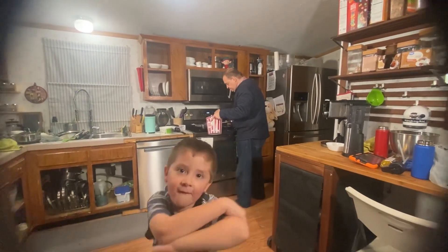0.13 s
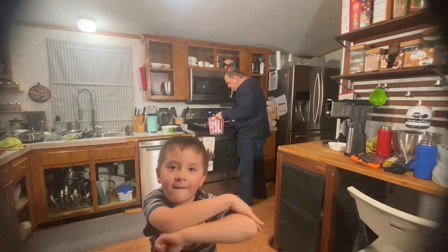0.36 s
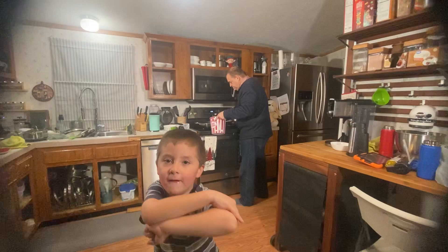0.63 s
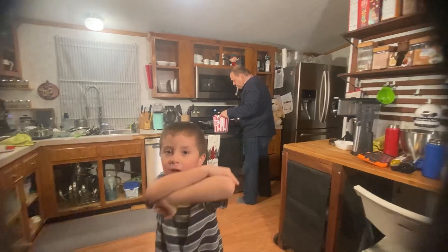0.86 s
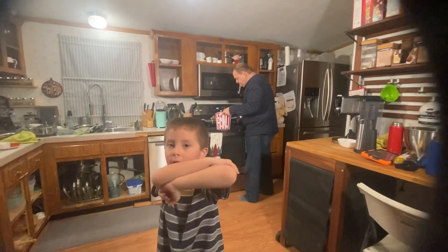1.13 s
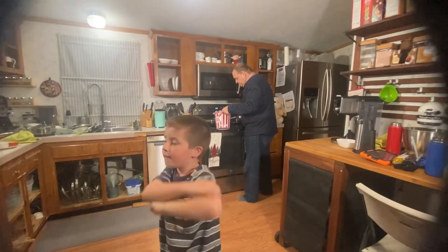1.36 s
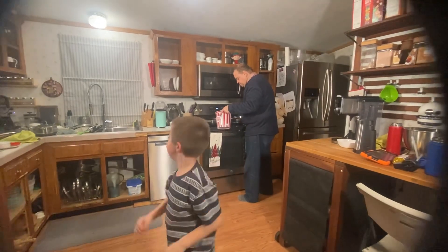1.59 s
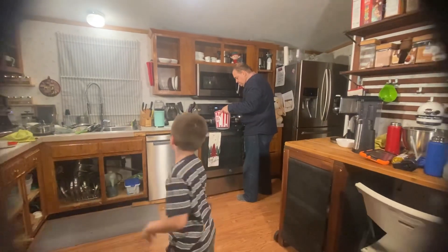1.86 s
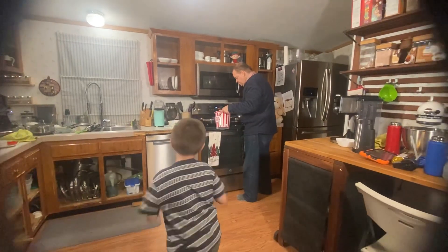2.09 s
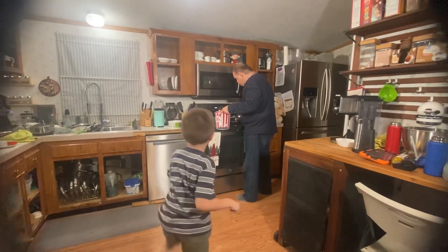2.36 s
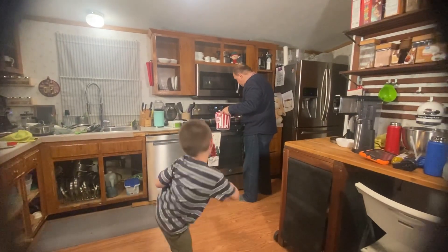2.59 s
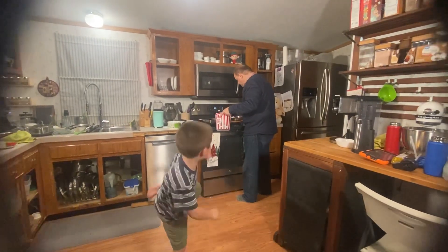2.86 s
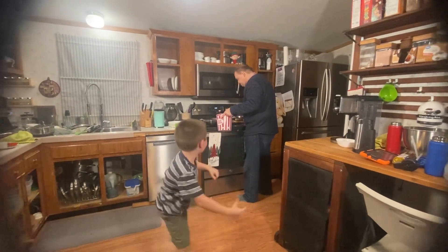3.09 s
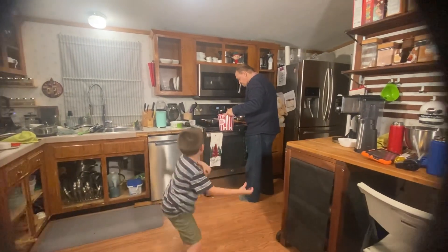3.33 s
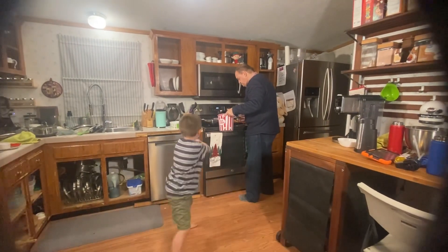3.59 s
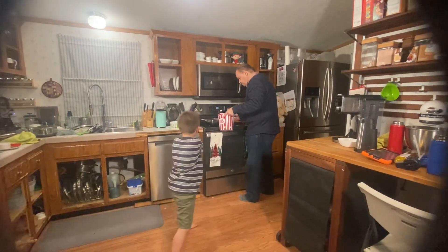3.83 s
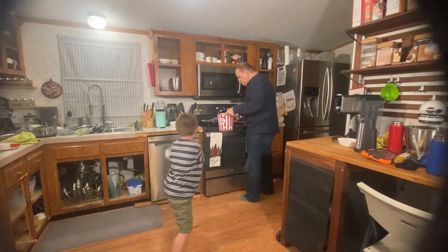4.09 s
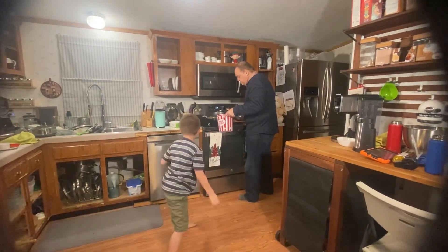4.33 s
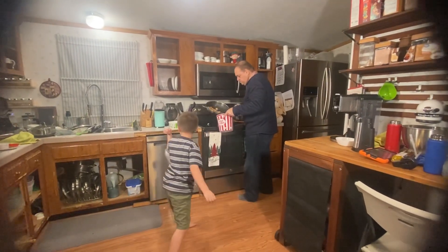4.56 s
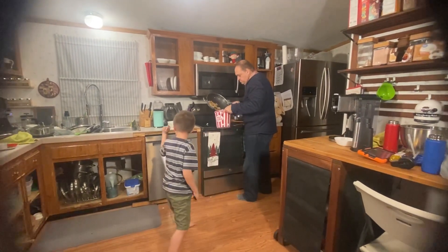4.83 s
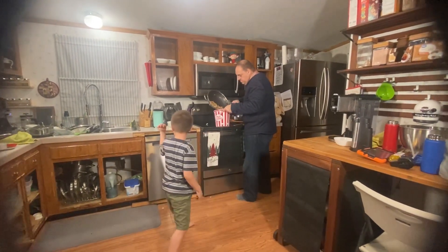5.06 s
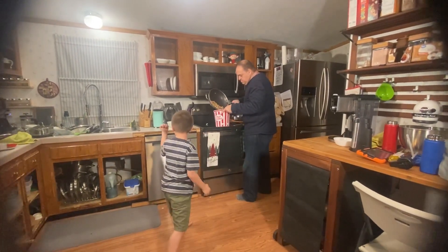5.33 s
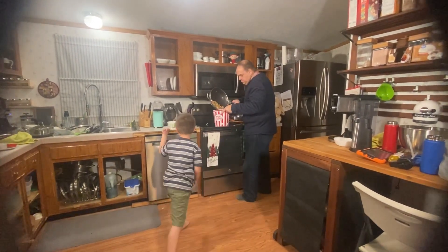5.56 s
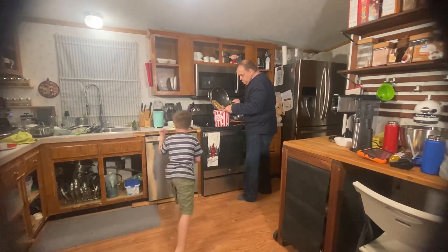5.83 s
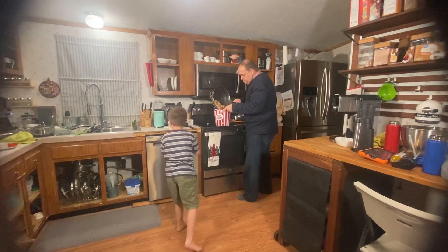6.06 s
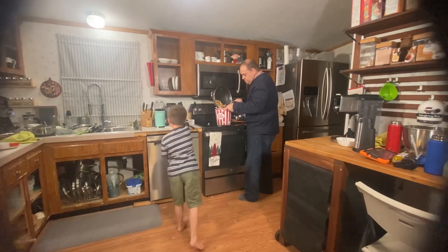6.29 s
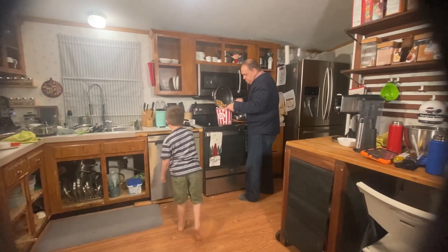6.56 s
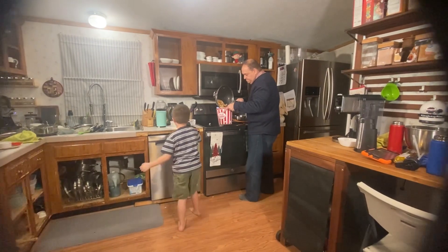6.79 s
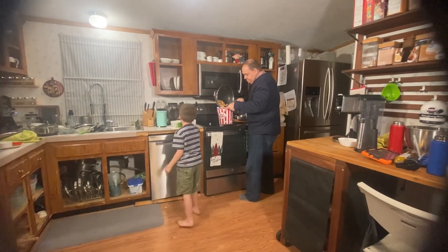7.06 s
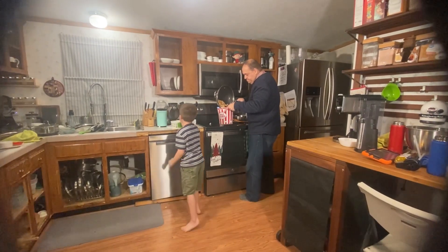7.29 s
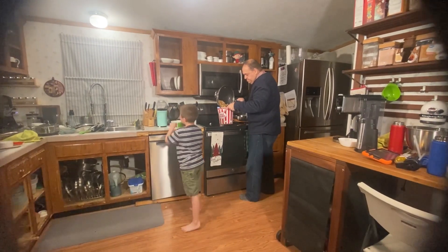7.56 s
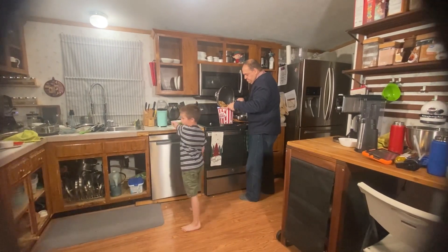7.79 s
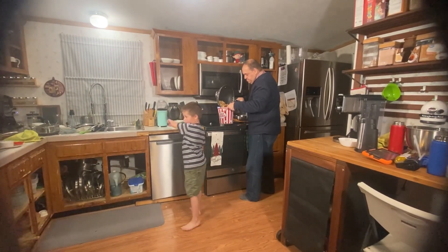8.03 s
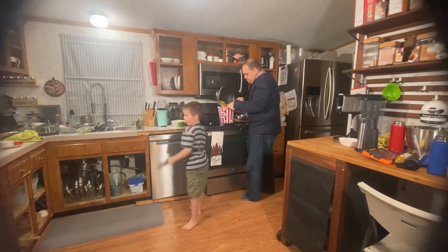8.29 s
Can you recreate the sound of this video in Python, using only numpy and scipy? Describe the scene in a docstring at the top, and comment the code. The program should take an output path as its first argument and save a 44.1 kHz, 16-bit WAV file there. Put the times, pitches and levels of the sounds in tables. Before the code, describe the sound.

A lid rings briefly, followed by a pause over appliance hum. Sharp spoon knocks on a damped pot mix with low rustling at the microphone, a loud diving bump and busy scraping and barefoot shuffling on a wooden floor. Two heavier footfalls land, scraping fades, and quieter scattered pot knocks continue with tiny dry clicks. Short indoor reverberation, recorded by a small camera from across the kitchen.

```python
"""Popcorn pot across a home kitchen

A small camera with two microphone ports hears a spoon knock and scrape a pot of sticky popcorn across the room:
damped resonances with noise cracks, and clumped noise grains. Bare feet thud (floor modes) and shuffle on the wood;
a lid clangs (unsteady modes), dry ticks click, rustles brush the ports and bumps shake the mount (diving chirps).
A fridge and a fan hum underneath (wavering lines and shaped noise), and their level dips twice."""
import sys
import numpy as np
from scipy import signal
from scipy.fft import rfft, irfft, next_fast_len
from scipy.io import wavfile
from scipy.ndimage import uniform_filter1d, map_coordinates

SR = 44100
rng = np.random.default_rng(int(sys.argv[2]) if len(sys.argv) > 2 else 0)


def output_pcm(signal):
    """Save a mono or channel-first signal as 16-bit PCM at the path in sys.argv[1].

    Samples are clipped to [-1, 1] before scaling.
    """
    pcm = np.clip(np.atleast_2d(signal).T, -1, 1) * 32767
    wavfile.write(sys.argv[1], SR, np.round(pcm).astype(np.int16))


def volts_from_decibels(level):
    """Turn decibel levels (scalar or array-like) into linear amplitude factors."""
    exponent = np.asarray(level, float) / 20
    return 10 ** exponent


N = 370881

# Treble colour of grainy noise and dry ticks. Each row: frequency in Hz, relative density in dB per Hz.
FIZZ_COLOUR = [(2940, -28.5), (5000, -2), (5420, -2), (7160, 3), (8530, -5), (9710, -5.5), (11600, -25.5),
               (15100, -50), (22000, -120)]
# Half the left-right difference goes to each port.
LEFT_RIGHT = np.array([[.5], [-.5]])


def unit(x):
    """Scaled to rms 1."""
    return x / np.sqrt(np.mean(x ** 2) + 1e-20)


def along(points, hz):
    """Values at hz, read between (Hz, value) points on a log axis."""
    f, v = np.transpose(points)
    return np.interp(np.log(hz + 1), np.log(f + 1), v)


def wobble(rate):
    """A smooth random curve, rate knots a second."""
    knots = rng.standard_normal(int(N * rate / SR) + 4)
    coarse = np.arange(0, N + 16, 16)  # the spline is read every 16 samples
    return np.interp(np.arange(N), coarse, map_coordinates(knots, [coarse * rate / SR]))


def filtered(x, response):
    """x times a complex response of frequency."""
    m = next_fast_len(N + 8192)
    return irfft(rfft(x, m) * response(np.fft.rfftfreq(m, 1 / SR)), m)[..., :N]


def coloured(x, spectrum):
    """x weighted by a spectrum in dB."""
    return filtered(x, lambda hz: volts_from_decibels(along(spectrum, hz)))


def modes(table):
    """The causal response of resonances, given as (Hz, width Hz, dB), with alternating signs."""
    def response(f):
        total = 0
        for k, (centre, width, db) in enumerate(table):
            damping = 1j * f * width
            total = total + (-1) ** k * volts_from_decibels(db) * damping / (centre * centre - f * f + damping)
        return total
    return response


def swells(table, shape):
    """For each row a gain that climbs to its peak and sinks, 20 dB down one rise before and one fall after.
    Shape 1 gives pointed swells, 2 bell-shaped, more flat-topped."""
    for s, db, rise, fall, last in table:
        start = max(round((s - 3 * rise) * SR), 0)
        end = min(round((s + 3 * fall) * SR), N)
        t = np.arange(start, end) / SR - s
        distance = np.abs(t / np.where(t < 0, rise, fall))
        yield slice(start, end), volts_from_decibels(db - 20 * distance ** shape), last


def patchy(depth_db):
    """A pair of noises whose colour shifts in random patches, the same patches in both."""
    z = signal.stft(rng.standard_normal((2, N)), nperseg=256)[2]
    field = uniform_filter1d(rng.standard_normal(z.shape[1:]), size=2, axis=0)
    field = uniform_filter1d(field, size=36, axis=1)
    return signal.istft(z * volts_from_decibels(depth_db * unit(field)), nperseg=256)[1][:, :N]


def diffuse(pair, spectrum):
    """Two unrelated noises given a spectrum and mixed to the likeness of the room's sound field, rms 1."""
    # Likeness of the two ports. Each row: frequency in Hz, left-right correlation (1 = alike, -1 = opposite).
    likeness = [(35, 0.3), (60, -1.3), (140, 1), (340, 0.24), (820, -0.21), (1950, -0.15), (4660, -0.09),
                (11100, 0.11)]

    def weights(hz):
        turn = np.arccos(np.clip(along(likeness, hz), -1, 1)) / 2
        return volts_from_decibels(along(spectrum, hz)) * [np.cos(turn), np.sin(turn)]

    mid, side = filtered(pair, weights)
    return unit(np.array([mid + side, mid - side]))


def room(share, early_db):
    """A stereo tail, energy 1 at the left: near walls load the start; each frequency dies at its own speed,
    then the camera's noise suppression cuts the tail short."""
    # Decay of the tail as the camera passes it. Each row: frequency in Hz, scale of the decay time in seconds.
    decay = [(200, 0.35), (1000, 0.35), (4000, 0.32), (10000, 0.073)]
    hz, t, z = signal.stft(rng.standard_normal((2, SR // 5)), SR, nperseg=128)
    age = t / (np.clip(share, .05, 2) * along(decay, hz)[:, None])
    late = volts_from_decibels(-35 * age - 60 * age ** 3)  # the cubic term is the suppression's cut
    early = volts_from_decibels(early_db - 60 * t / 0.049)
    tail = signal.istft(z * (late + early), SR, nperseg=128)[1]
    tail *= 1 - np.exp(-np.arange(tail.shape[1]) / SR / 0.0026)  # the echoes thicken at first
    return tail / np.linalg.norm(tail[0])


def dips():
    """A background gain that slides down, holds, and creeps back."""
    # Each row: start in seconds, depth in dB, fall in seconds, hold in seconds, recovery time constant in seconds.
    moments = [(2.844, -8, .11, 0.22, 0.059), (4.835, -8.5, 0.03, .02, 0.48)]
    t = np.arange(N) / SR
    total_db = 0
    for s, db, fall, hold, back in moments:
        slide = np.clip((t - s) / fall, 0, 1)
        total_db = total_db + db * slide * np.exp(-np.maximum(t - s - fall - hold, 0) / back)
    return volts_from_decibels(total_db)


def hum():
    """Motor lines that waver a little in level and phase."""
    # Each row: frequency in Hz, left rms in dB, right rms in dB, lead of the right port in radians,
    # waver in dB (the sign only flips the random curve; a tenth of it, in radians, sways the phase).
    lines = [(54.5, -61.5, -54.5, 0.25, -1), (74.7, -47.5, -43, 0.092, 0), (115, -73, -64.5, 0.066, 4),
             (151.7, -72, -69.5, 0, -3), (172.6, -73.5, -66.5, 0.16, 4.5), (240.7, -69, -76, 0.047, 3.5),
             (284, -67.5, -65.5, 0.16, 2), (326.8, -64.5, -64, 0, 4)]
    t = np.arange(N) / SR
    out = np.zeros((2, N))
    for hz, left_db, right_db, lead, waver_db in lines:
        level = np.sqrt(2) * volts_from_decibels([[left_db], [right_db]] + waver_db * wobble(2.8))
        sway = 0.1 * waver_db * wobble(2.0)
        out += level * np.sin(2 * np.pi * hz * t + rng.uniform(0, 2 * np.pi) + sway + [[0], [lead]])
    return out


def air(spectrum, db):
    """The steady rush of the appliances: diffuse noise whose level wavers slightly."""
    return volts_from_decibels(db + 0.73 * wobble(6.8)) * diffuse(rng.standard_normal((2, N)), spectrum)


def rustle():
    """Lumpy low noise against the ports, different at each."""
    # Each row: peak in seconds, relative level in dB, rise in seconds, fall in seconds, left over right in dB.
    brushes = [(1.02, -48.5, .6, 0.057, 4), (1.178, -42.5, .14, 0.11, 5),
               (1.248, -26.5, 0.028, 0.013, 14.5), (1.302, -41, .03, 0.048, 2), (1.52, -47, .4, 0.12, 5),
               (1.818, -42.5, .2, 0.088, 4), (1.992, -48, .16, 0.07, 6), (2.34, -47.5, .35, .25, 7),
               (2.62, -55, .3, .3, -3), (2.78, -40, .06, .05, 7), (2.866, -37, .05, 0.086, 2.5)]
    # Each row: frequency in Hz, relative density in dB per Hz.
    rumble = [(18, -37.5), (30, -8.5), (102, -0.5), (194, -6), (368, -13.5), (600, -27), (780, -43.5),
              (1320, -120)]
    power = np.zeros((2, N))
    for span, gain, pan_db in swells(brushes, 1.57):
        power[:, span] += (gain * volts_from_decibels(-2.5 + pan_db * LEFT_RIGHT)) ** 2
    lumps = volts_from_decibels(1.5 * np.array([wobble(30), wobble(30)]))
    return np.sqrt(power) * unit(lumps * coloured(rng.standard_normal((2, N)), rumble))


def bumps():
    """A bending wave runs through the camera mount, treble first, so the pitch dives; it rocks the two ports
    in opposite ways."""
    # Each row: start in seconds, left dB, right dB, tick in dB, time in seconds to fade by 60 dB.
    hits = [(1.7028, 1, -1.8, -4, .074), (1.7281, -10, -10, -2, .033)]
    out, t = np.zeros((2, N + SR)), np.arange(1, SR // 4) / SR
    dive = np.cos(6.58 * np.log(t / .0157) + 169 * (t - .0157))
    near = (1 - .35 * np.exp(-t / .006)) / (1 + (.0003 / t) ** 4)
    far = -1 / (1 + (.004 / t) ** 2)  # opposite, and slower to build
    tick_fade = volts_from_decibels(-60 * t / 0.003) + volts_from_decibels(-19 - 60 * t / 0.043)
    for s, left_db, right_db, tick_db, t60 in hits:
        fade = volts_from_decibels(-60 * (t / t60) ** 3)
        tick = volts_from_decibels([[tick_db], [tick_db - 23.0]]) * tick_fade * rng.standard_normal((2, len(t)))
        tick -= uniform_filter1d(tick, size=15)  # the tick has no bass
        rock = dive * fade * [volts_from_decibels(left_db) * near, volts_from_decibels(right_db) * far]
        out[:, round(s * SR):][:, :len(t)] += tick + rock
    # the port's own resonance
    return filtered(out[:, :N], lambda f: 1 / (1 + 1j * f / 7500 - (f / 6300) ** 2) ** 2)


def steps():
    """A heel pushes the floor softly; its modes answer at new strengths and slightly new pitches each time."""
    # Each row: footfall in seconds, relative level in dB, extra dB for the modes above 90 Hz.
    footfalls = [(0.078, -41, 6.5), (1.287, -34, -4), (1.521, -39.5, 1.5), (2.288, -51.5, 16.5),
                 (2.606, -33.5, -11), (2.64, -49, -15), (2.779, -55, 11), (2.86, -60, 11),
                 (3.301, -22.5, 1), (3.347, -20.5, -2.5), (3.438, -37.5, 4), (4.561, -54.5, 11),
                 (6.79, -39, -9.5), (6.968, -59.5, 17.5)]
    # Modes of the wooden floor. Each row: nominal frequency in Hz, nominal level in dB, 60 dB decay in seconds.
    boards = [(36, -8, 0.35), (52, -1, 0.38), (62.5, -2, 0.26), (118, 0, 0.12), (153.8, -5, 0.1),
              (217.7, -6, 0.066), (335, -7.5, 0.094)]
    out, t = np.zeros((2, N + SR)), np.arange(SR // 3) / SR
    push = 1 - np.exp(-t / .006)
    for s, db, upper_db in footfalls:
        for hz, level, t60 in boards:
            size_db, tune = rng.normal(0, [2.5, .03])
            turn = 2 * np.pi * hz * (1 + tune) * t + np.array([[-.5], [0]])  # the left port lags
            shape = volts_from_decibels(db + level + size_db + upper_db * (hz > 90) - 60 * t / t60) * push
            out[:, round(s * SR):][:, :len(t)] += volts_from_decibels(-0.5) * shape * np.sin(turn)
    return out[:, :N]


def ticks():
    """Tiny dry clicks of treble only: noise that fades by 60 dB in 30 ms."""
    # Each row: start in seconds, relative level in dB.
    clicks = [(0.428, -65), (2.1, -50), (2.187, -46.5), (5.2278, -63.5), (6.4094, -72.5), (6.5106, -66),
              (6.9584, -52.5), (7.4591, -65), (7.5895, -61.5), (7.739, -62), (7.869, -67.5), (8.2924, -63)]
    out, t = np.zeros((2, N + SR)), np.arange(SR // 50) / SR
    for s, db in clicks:
        out[:, round(s * SR):][:, :len(t)] += volts_from_decibels(db + 2.0 - 60 * t / 0.03) * rng.standard_normal((2, len(t)))
    return coloured(out[:, :N], FIZZ_COLOUR)


def clang():
    """The lid's modes die away with unsteady phase, over the room's answer to the crash."""
    # A metal lid set down at the start. Each row: frequency in Hz, relative level in dB, 60 dB decay in seconds.
    lid = [(996, -3.5, 0.27), (1178, 0.5, 0.21), (1830, 0.5, 0.31), (3020, -18.5, 0.37), (3520, -18, 0.44),
           (4170, -15.5, 0.37), (4468, -12.5, 0.22)]
    # Each row: frequency in Hz, relative density in dB per Hz.
    crash_colour = [(120, -37), (200, -15), (1210, -12), (1360, -20), (1850, 0), (2880, -23.5),
                    (6960, -11.5), (11600, -21), (15100, -67), (22000, -120)]
    t = np.arange(SR) / SR
    drift = 1.3 * np.array([wobble(110), wobble(110)])[:, :SR]  # radians
    ring = np.zeros((2, SR))
    for hz, db, t60 in lid:
        turn = 2 * np.pi * hz * t + rng.uniform(0, 2 * np.pi) + drift
        ring += volts_from_decibels(db - 3.0 - 60 * t / t60) * np.sin(turn)
    crash = room(share=0.8, early_db=3.0)
    crash = np.pad(crash, ((0, 0), (0, N - crash.shape[1])))
    return volts_from_decibels(20) * coloured(crash, crash_colour) + np.pad(volts_from_decibels(-25) * ring, ((0, 0), (0, N - SR)))


def scrape():
    """Mostly friction: dense clumped grains of shifting colour; a duller stroke has more body and less fizz."""
    # Grainy noise: mostly scraping and shuffling, also the lid crash's fading hiss and a soft lead-in to a knock.
    # Each row: peak in seconds, relative level in dB, rise in seconds, fall in seconds, dullness in dB.
    strokes = [(0.075, -51, 0.018, 0.11, -7), (0.24, -70.5, .15, 0.12, -11.5),
               (0.454, -66, 0.088, 0.064, 0), (1.012, -59.5, .06, .035, 9), (1.4, -53, .07, 0.4, -0.5),
               (1.524, -52, .04, 0.045, 2), (1.63, -56.5, 0.13, 0.2, -8), (1.79, -37.5, .07, 0.076, -4.5),
               (1.87, -55, 0.073, .18, -6.5), (1.962, -39.5, 0.015, 0.03, -1.5),
               (2.07, -57.5, 0.39, 0.12, 0.5), (2.214, -53, .035, 0.054, -6),
               (2.262, -45.5, 0.0083, 0.03, -1.5), (2.335, -47, 0.069, 0.1, 0),
               (2.478, -56.5, 0.14, 0.185, -2), (2.6, -59, 0.025, 0.082, 11.5),
               (2.72, -52.5, 0.078, .2, 0.5), (2.782, -40, 0.027, .06, -5),
               (2.83, -41.5, 0.078, 0.16, -2.5), (2.96, -67.5, 0.11, 0.18, 8),
               (3.172, -60.5, 0.021, 0.067, 8.5), (3.216, -45.5, 0.03, 0.073, 2.5),
               (3.298, -42.5, 0.012, 0.12, 5.5), (3.424, -56.5, 0.043, 0.11, 11),
               (3.53, -49.5, 0.074, 0.13, -6.5), (3.65, -40.5, .1, 0.22, -7), (3.77, -48, 0.3, 0.064, -5),
               (4.084, -57.5, 0.065, 0.13, 3), (4.22, -71.5, 0.051, 0.0956, -12),
               (4.525, -50.5, .02, .085, 2), (5.176, -72, 0.013, 0.066, 2), (5.232, -66.5, .015, 0.093, -3),
               (5.424, -70.5, 0.053, 0.068, -2), (5.565, -60, 0.016, .03, 5),
               (5.875, -65.5, 0.096, 0.064, -8.5), (6.12, -77.5, .08, .08, 2),
               (6.815, -47.5, 0.049, 0.058, -9), (7.72, -74.5, 0.052, 0.072, 12)]
    # Colours of the grit and of the body below it. Each row: frequency in Hz, relative density in dB per Hz.
    grit_colour = [(820, -27), (1400, -6), (1600, -10.5), (1970, 1.5), (2160, -5.5), (2710, -7.5),
                   (3630, -2.5), (5000, -17.5), (6500, -39.5), (11000, -120)]
    body_colour = [(210, -32.5), (350, -4), (872, -6), (1020, -0.5), (1460, -18.5), (1700, -11.5),
                   (2210, -45), (3740, -120)]
    # Thin wall modes that sing under friction. Each row: frequency in Hz, width in Hz, relative level in dB.
    wall = [(2070, 150, -9.5), (3675, 260, -3.5)]
    power = np.zeros((3, N))  # grit, body, fizz
    for span, gain, dull_db in swells(strokes, 1.684):
        balance_db = [[0], [dull_db - 3], [-10 - 1.05 * dull_db]]
        power[:, span] += (gain * volts_from_decibels(balance_db)) ** 2
    clumps = volts_from_decibels(.9 * wobble(35) + 2.2 * wobble(400))
    grains = clumps * patchy(depth_db=2.5)
    grit, body, fizz = (diffuse(grains, colour) for colour in (grit_colour, body_colour, FIZZ_COLOUR))
    sing = volts_from_decibels(4.5 + 1.2 * wobble(4)) * filtered(grit, modes(wall))
    return sum(np.sqrt(p) * layer for p, layer in zip(power, (grit + sing, body, fizz)))


def knocks():
    """Each spoon blow rings the damped pot and cracks; it reaches both ports mostly by the walls."""
    # Each row: blow in seconds, relative treble level in dB, body over treble in dB before fixed offsets,
    # tail length as a relative share.
    blows = [(1.1676, -42.5, -4, 1), (1.235, -33.5, 5, 0.36), (1.2447, -28.5, -3, 0.17),
             (1.2573, -39, -4, 0.22), (2.2102, -37.5, -2.5, 0.63), (2.7736, -50, 2, 1),
             (2.851, -30, -8.5, 0.27), (3.2048, -40.5, 1, 0.38), (3.2952, -47, -10.5, 0.85),
             (3.3286, -42, 6, 1), (3.419, -49, 13, 0.54), (4.5125, -50, 4, 0.49),
             (4.5494, -44.5, -2.5, 0.4), (4.8306, -43, 0.5, 0.21), (5.1762, -57.5, -4.5, 0.52),
             (5.23, -60.5, 10, 0.55), (5.5678, -38.5, 7, 0.96), (5.609, -50, 13, 0.82),
             (5.6569, -49, -13, 0.61), (6.219, -54.5, -6, 1), (6.2957, -46, 10.5, 0.82),
             (6.3827, -48, 12.5, 0.77), (6.8024, -37, -10, 0.99), (6.9793, -37, 3.5, 0.98),
             (7.014, -42.5, 2, 0.41), (7.094, -42, 7.5, 0.67), (7.64, -63, -3.5, 0.62),
             (7.7394, -67, 6.5, 0.45), (7.951, -38.5, 6.5, 0.83), (8.1294, -39, 7.5, 0.77)]
    # Resonances of the filled pot. Each row: frequency in Hz, width in Hz, relative level in dB.
    pot = [(364.5, 58, -2), (485.5, 65, -5.5), (802, 60, 3), (932, 60, 1), (1100.5, 70, -0.5),
           (1250, 52, -5), (1640, 76, -11), (1990, 110, -10), (2286, 35, -11), (3140, 190, -15.5),
           (3680, 92, -18), (4590, 120, -22)]
    # Treble of a blow. Each row: frequency in Hz, relative density in dB per Hz.
    crack = [(880, -46.5), (1500, -3), (1780, -1.5), (2820, -9.5), (4560, -11.5), (5410, -13), (7170, -13),
             (11600, -45), (15100, -67.5), (22000, -120)]
    pan = volts_from_decibels(0.5 * LEFT_RIGHT)  # the pot is 0.5 dB louder at the left

    def add_blow(out, s, level_db, direct_db, early_db, share):
        path = room(share, early_db)
        path[:, 0] += volts_from_decibels(direct_db)  # the straight way across the room
        out[:, round(s * SR):][:, :path.shape[1]] += volts_from_decibels(level_db) * pan * path

    dull, sharp = np.zeros((2, 2, N + SR))
    for s, db, body_db, share in blows:
        add_blow(dull, s, db + body_db + 40, direct_db=-7, early_db=8, share=share * .9)
        add_blow(sharp, s, db + 33.0, direct_db=-19, early_db=1.5, share=share * 1.1)
    return filtered(dull[:, :N], modes(pot)) + coloured(sharp[:, :N], crack)


def scene():
    """Airborne sound passes the shading of the ports; mount, rustles and hum reach them directly."""
    # Appliance rumble, then hiss. Each row: frequency in Hz, relative density in dB per Hz.
    rumble = [(9.4, -79), (20, -32), (43, -15.5), (59, -2), (80, -6.5), (144, -26), (178, -21.5),
              (261, -24.5), (332, -21.5), (358, -23), (600, -43.5), (780, -93), (1320, -120)]
    hiss = [(450, -43), (600, -14.5), (800, 3.5), (1100, 4), (1400, -8), (1900, -7.5), (2500, -15),
            (4400, -19.5), (4900, -10.5), (5300, -22.5), (7000, -18), (8000, -21.5), (11000, -31),
            (13000, -64.5)]
    # The camera body shades each port differently. Each row: frequency in Hz, left over right in dB.
    shading = [(60, -3), (110, -4.5), (190, -10.5), (340, -5), (610, 1), (1090, -3.0), (1950, 1.5),
               (3490, 3), (6230, 9), (11100, -7)]
    dip = dips()
    background = dip * air(rumble, db=-49) + dip ** 0.11 * air(hiss, db=-66.5)  # the hiss hardly dips
    airborne = background + steps() + ticks() + clang() + scrape() + knocks()
    shaded = filtered(airborne, lambda hz: volts_from_decibels(along(shading, hz) * LEFT_RIGHT))
    return shaded + dip * hum() + rustle() + bumps()


def low_pass(x):
    """Removes everything above the highest recorded frequency."""
    return signal.sosfilt(signal.butter(12, 11730, fs=SR, output="sos"), x)


def record(dry):
    """The camera's input clips at full scale."""
    mix = np.clip(dry, -1, 1)
    return low_pass(mix)


dry = scene()
out = record(dry)
output_pcm(out)
```